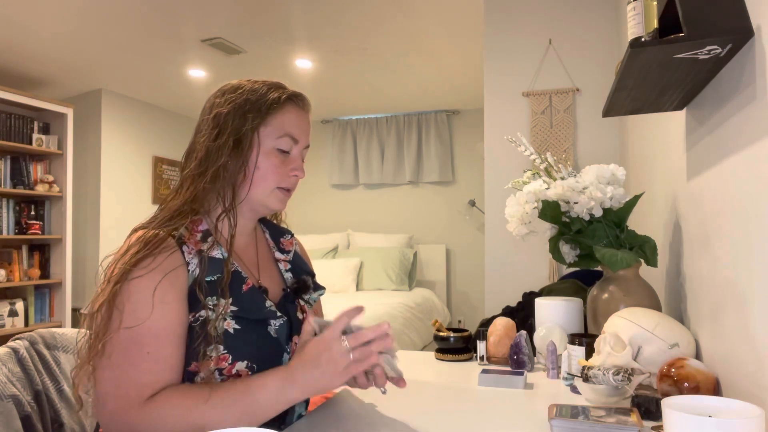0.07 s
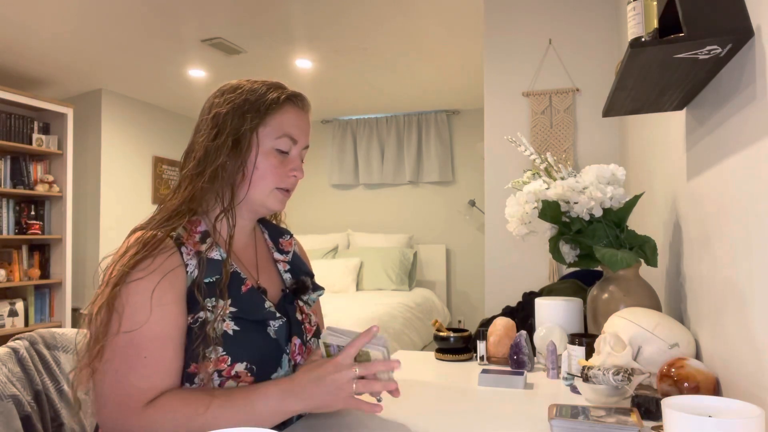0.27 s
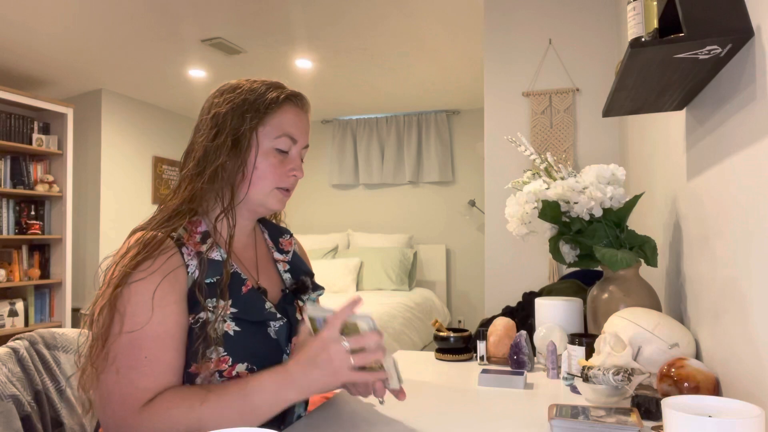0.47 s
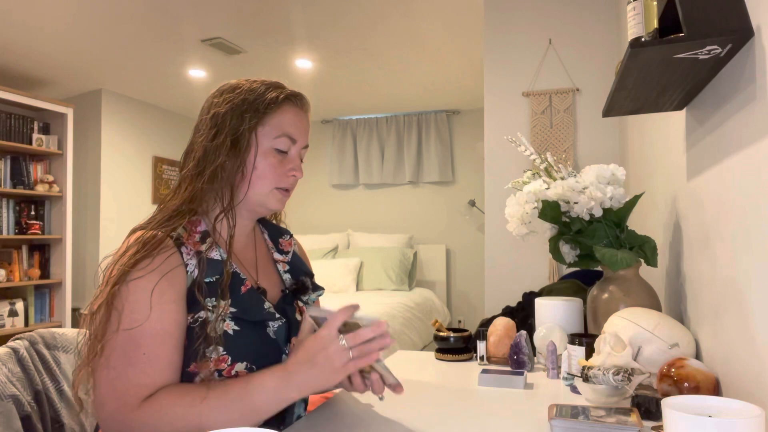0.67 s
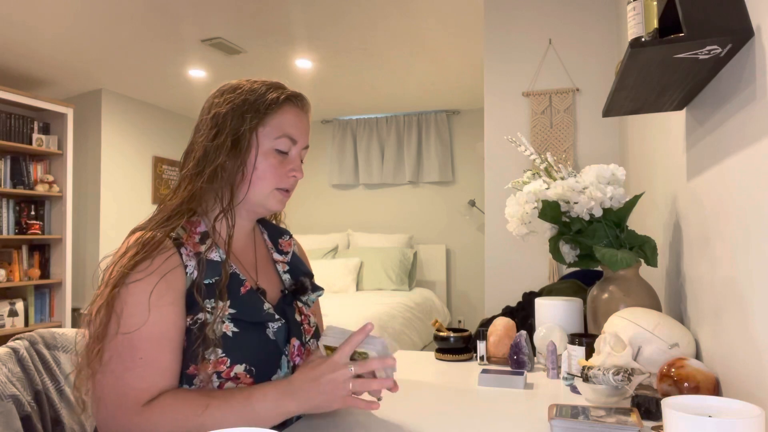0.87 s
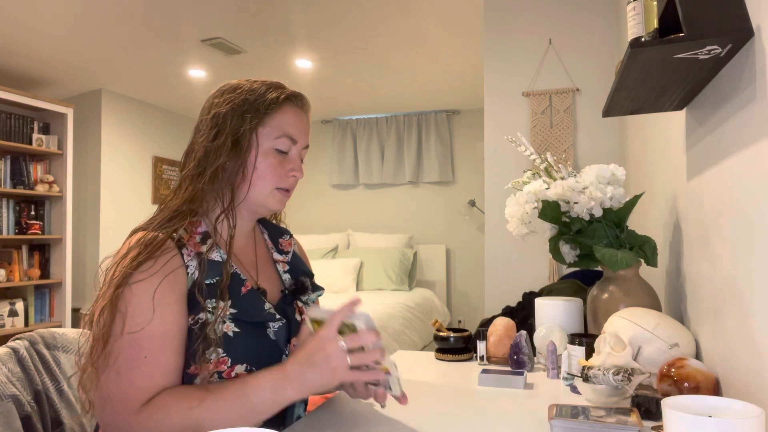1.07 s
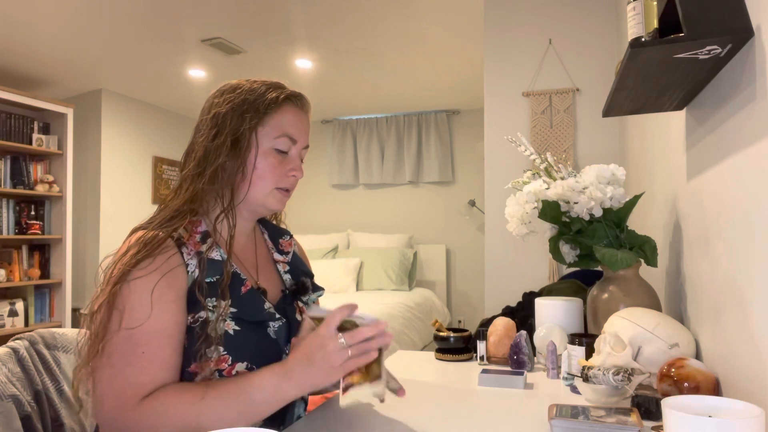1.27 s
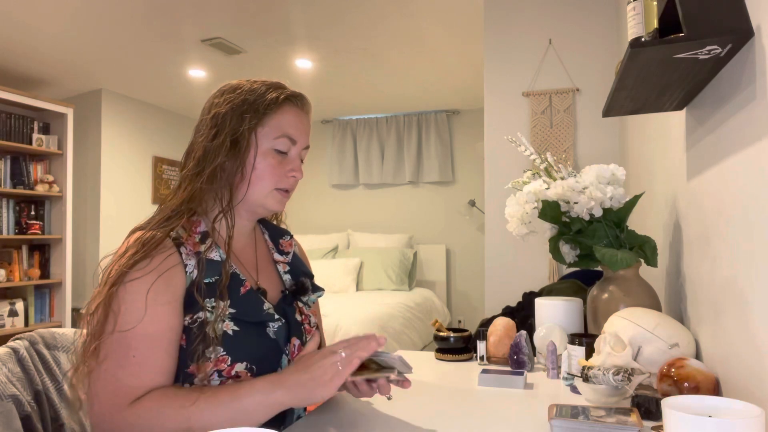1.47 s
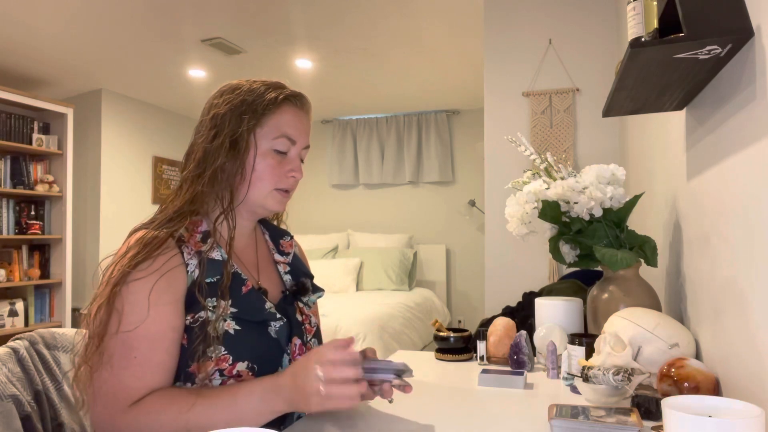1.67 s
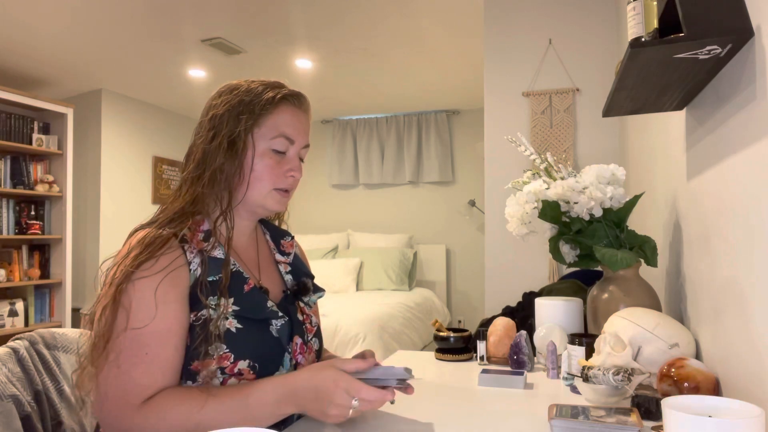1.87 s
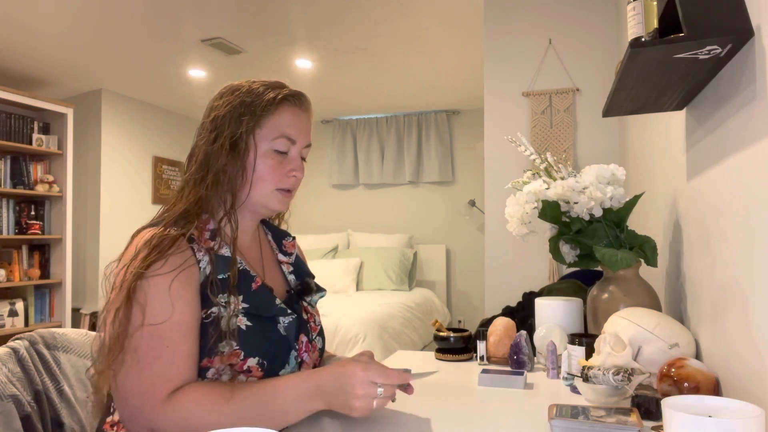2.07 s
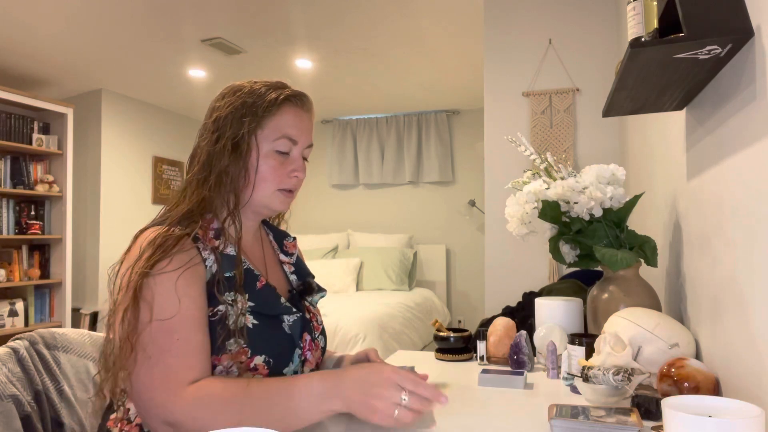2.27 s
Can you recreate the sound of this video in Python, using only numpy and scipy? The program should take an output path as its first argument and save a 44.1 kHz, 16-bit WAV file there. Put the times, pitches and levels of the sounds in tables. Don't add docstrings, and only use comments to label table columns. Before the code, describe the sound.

A deck of large cards is shuffled by hand. Papery flicks at the start, a light snap near 0.44 s, a sharp bright clack at 0.64 s, then faint sliding. From 1.15 to 1.3 s a dense burst of snaps and knocks, loudest at 1.2 s. Afterwards quiet rubs, ticks near 1.65, 1.72 and 1.86 s, soft woody taps at 2.08 and 2.3 s. Soft room, low hum, phone microphone.

```python
import sys
import numpy as np
from scipy import signal
from scipy.fft import rfft, irfft
from scipy.io import wavfile
from scipy.ndimage import uniform_filter1d

SR = 44100
rng = np.random.default_rng(int(sys.argv[2]) if len(sys.argv) > 2 else 0)


def invert_db(x):
    u = np.asarray(x, float) / 20
    return 10 ** u


def materialize(psi):
    bounded = np.clip(np.atleast_2d(psi).T, -1, 1)
    quanta = np.round(bounded * 32767).astype(np.int16)
    wavfile.write(sys.argv[1], SR, quanta)


N = 102267


def level(x, db):
    return x * invert_db(db) / np.sqrt(np.mean(x ** 2))


def band(x, hz, q):
    q = max(q, hz / 15000)
    return signal.lfilter(*signal.iirpeak(hz, q, fs=SR), x)


def walk(rate_hz, size=N):
    hold = int(SR / rate_hz)
    steps = np.repeat(rng.standard_normal(size // hold + 1), hold)
    return 1.3 * uniform_filter1d(uniform_filter1d(steps, hold), hold)[:size]


def add(out, t, x):
    i = max(int(t * SR), 0)
    out[i:i + len(x)] += x[:max(len(out) - i, 0)]


def coloured_noise(gain):
    hz = np.arange(N // 2 + 1) * SR / N + 0.12
    return irfft(rfft(rng.standard_normal(N)) * gain(hz), N)


# [f/Hz, level/dB per Hz]
TONE_SPECTRUM = [(18, -4.5), (30, -15.5), (60, -21), (280, -35.5), (900, -43), (1800, -47.5), (4000, -64),
                 (15000, -77)]


def room_tone():
    tone_db, flicker_db = -35.5, 1.2
    f, db = np.array(TONE_SPECTRUM).T
    hum = coloured_noise(lambda hz: invert_db(np.interp(np.log(hz), np.log(f), db)) * (hz > 14))
    return level(hum * invert_db(flicker_db * walk(5)), tone_db)


def air_sway():
    sway_hz, width_hz, sway_db = 3.88, 3.63, -16.5
    sway = level(coloured_noise(lambda hz: 1 / (1 + ((hz - sway_hz) / width_hz) ** 4)), sway_db)
    t, rest_s = np.arange(N) / SR, 0.06
    return sway * np.tanh(t / rest_s) * np.tanh(t[::-1] / rest_s + .3)


# [f/Hz, T60/s, level/dB]
ROOM_DECAY = [(298.4, 0.3, 6.5), (1200, .22, 7.5), (4000, 0.067, -6), (11000, .18, -4.5)]


def room(x):
    room_db, gap_s = -10.5, 0.0031
    t = np.arange(SR // 2) / SR
    tail = np.zeros(len(t))
    for hz, t60, db in ROOM_DECAY:
        tail += invert_db(db) * band(rng.standard_normal(len(t)), hz, 0.75) * invert_db(-60 * t / t60)
    tail *= np.clip(t / gap_s, 0, 1) ** 2
    tail *= invert_db(room_db) / np.sqrt(np.sum(tail ** 2))
    return signal.fftconvolve(x, tail)[:N]


# [t/s, level/dB, f/Hz, sharpness of
KNOCKS_AND_RINGS = [(.02, -31, 213, 1.3), (.45, -42, 340, 1.6), (0.637, -24, 403, 1.6), (.6375, -23, 884, 3.1),
                    (0.649, -29.5, 263, 1), (.6351, -9.5, 2450, 4.5), (.636, -22, 1500, 3), (.651, -29, 750, 3),
                    (.624, -38, 350, 2), (0.764, -43.5, 223, 1.7), (1.045, -35, 188, 3.6), (1.044, -28, 780, 4.5),
                    (1.147, -26, 330, 1.4), (1.149, -23, 800, 3.4), (1.148, -19, 1900, 2.2), (1.148, -24, 5200, 5),
                    (1.199, -14, 620, 4), (1.192, -21, 560, 3), (1.191, -27, 340, 2.5), (1.172, -22, 600, 3),
                    (1.182, -25, 700, 4), (1.233, -29, 620, 5), (1.206, -24, 370, 4), (1.219, -25, 170, 2.5),
                    (1.229, -24, 330, 5), (1.22, -27, 560, 5), (1.258, -31, 520, 14), (1.305, -34, 520, 9),
                    (1.2, -8.5, 1040, 6), (1.2, -27.5, 148, 2.7), (1.2005, -12, 1570, 9), (1.201, -23.5, 753, 7.4),
                    (1.637, -29.5, 178, 2.7), (1.652, -37, 338, 2.2), (1.72, -37.5, 326, 2.7),
                    (1.7205, -38, 2620, 45), (1.72, -34, 1480, 9), (1.863, -35.5, 1200, 6.1),
                    (1.971, -32.5, 101, 1.9), (2.077, -29.5, 480, 22), (2.076, -33, 660, 12),
                    (2.0756, -21.5, 1354, 13), (2.085, -31, 1380, 8), (2.305, -38, 600, 2), (0.769, -40, 320, 3),
                    (2.078, -33, 330, 5.4), (2.166, -30.5, 190, 2.5), (2.214, -32, 120.7, 1.3), (2.31, -35, 151, 2),
                    (.4392, -31, 1150, 4), (.4393, -30, 5600, 4), (.4395, -36, 2400, 3), (.6352, -19, 3700, 3),
              (1.7205, -45, 5400, 40), (1.721, -46, 8300, 25), (1.858, -41, 9400, 18),
              (2.077, -36, 2150, 8), (2.305, -41, 4200, 5), (1.222, -23, 4900, 4), (1.209, -24, 5000, 4),
              (.002, -32, 600, 3)]


def thuds():
    push_cycles = 0.13
    out, t = np.zeros(N), np.arange(6000) / SR
    for start, db, hz, q in KNOCKS_AND_RINGS:
        push = np.exp(-t * hz / push_cycles)
        knock = band(band(push, hz, q), hz, .7)
        add(out, start, knock * invert_db(db) / np.abs(knock).max())
    return out


# [start t/s, fullest t/s, end t/s, level/dB, grain centre f/Hz]
CARD_SLIDES = [(.012, 0.03, 0.065, -43.5, 2800), (0.003, 0.09, 0.148, -49, 6960),
               (0.188, 0.321, 0.41, -55, 6000), (0.348, 0.435, 0.46, -48, 12500),
               (0.57, 0.625, 0.66, -58, 11500), (0.5, 0.55, .62, -60, 12500),
               (0.628, 0.653, 0.62, -42, 2570), (0.645, 0.7, 0.785, -51, 6940),
               (0.83, 0.953, 1.15, -56.5, 7040), (1.003, 1.04, 1.07, -48, 11500),
               (1.168, 1.177, 1.22, -38, 3020), (1.2, 1.214, 1.33, -36, 3300),
               (1.26, 1.33, 1.44, -55.5, 4000), (1.415, 1.471, 1.515, -49, 2200),
               (1.624, 1.642, 1.76, -50, 3600), (1.716, 1.724, 1.795, -57, 4500),
               (1.9, 1.98, 2.25, -58, 2600), (1.914, 2.049, 2.12, -54, 11000),
               (2.302, 2.305, 2.33, -49, 5000), (2.025, 2.198, 2.356, -53.5, 207),
               (0.216, 0.254, 0.34, -57, 5400), (1.22, 1.262, 1.36, -42, 1700),
               (1.19, 1.215, 1.39, -45.5, 12000), (0.636, 0.652, 0.69, -46, 11500),
               (-.02, 0.001, 0.03, -46, 7000), (2.128, 2.138, 2.155, -60, 2500),
               (0.3, 0.35, 0.39, -56, 2300)]


def slides():
    edge_db, roundness = -25, 2.2
    slide_q, air_db = 0.48, -4.5
    grain_db, flicker_db = 2.2, 1.3
    out, size = np.zeros(N), SR // 2
    for start, full, end, db, hz in CARD_SLIDES:
        t = max(full - .25, 0) + np.arange(size) / SR
        unevenness_db = grain_db * rng.exponential(size=size) + flicker_db * walk(90, size=size)
        grains = rng.standard_normal(size) * invert_db(unevenness_db)
        rub = band(grains, hz, slide_q)
        hiss = level(band(rub, hz, slide_q) + invert_db(air_db) * rub, db)
        before = (full - t) / max(full - start, .002)
        after = (t - full) / max(end - full, .002)
        away = np.maximum(before, after)
        add(out, t[0], hiss * invert_db(edge_db * away ** roundness))
    return out


# [t/s, onset level/dB, ring f/Hz, crackle
# length/ms, treble level/dB]
SNAPS_AND_TICKS = [(.001, -27, 1900, 3.9, 4), (0.0241, -27, 1500, 5.1, 9), (.439, -30, 1150, 1.5, 12),
                   (.6351, -19, 6120, .8, 11.5), (.651, -26.5, 1520, 3.5, 8), (1.0445, -34, 1430, 2.9, -17),
                   (1.148, -25, 2240, 1.3, 5), (1.1718, -11, 1200, 3.2, -7), (1.1945, -27, 2380, 2.5, 5),
                   (1.2005, -9, 1570, 3.2, -23), (1.2075, -16.5, 2227, 5.6, -10.5),
                   (1.2215, -14.5, 2330, 4.4, -14), (1.235, -30, 1940, 3.0, -6), (2.0755, -35, 2300, 2, 0),
                   (2.085, -41, 2500, 1.4, -4), (2.3043, -35, 9500, 2, 5), (1.2003, -6.5, 4700, 1.24, 3),
                   (.655, -28.5, 2230, 2.6, 12),
                   (0.031, -36, 2600, 3.5, 6), (.35, -42.5, 2570, 14, -21), (0.457, -40, 3380, 1.6, 0),
              (0.626, -38, 620, 2.1, -8), (0.683, -47, 2500, 3.0, -3), (0.921, -48, 2800, 7.8, -8),
              (1.055, -60, 1200, 1.3, -9), (1.356, -40, 4500, 5, 5), (1.6306, -41, 2200, 3, 5),
              (1.7204, -33, 1500, 2.8, -3), (1.8581, -46, 9300, 2.2, -12), (1.8634, -43.5, 1220, 2.3, -4),
              (2.134, -47, 1520, 2.5, 10), (1.156, -46, 10500, 2.3, -6), (1.175, -22.5, 9500, 2.3, 6),
              (1.185, -25, 3000, 2.4, -5), (1.2025, -9, 1900, 0.83, 0), (1.212, -21.5, 2700, 2, -4),
              (1.224, -22.5, 2200, 2.5, 1), (1.259, -37, 4460, 1.4, -5), (1.266, -33, 1800, 2.5, 4),
              (1.303, -31, 2200, 3.6, -6), (.664, -39, 1520, 3.4, 0), (1.858, -49, 13400, 1.5, -25),
              (1.864, -46, 5000, 2, -10), (1.882, -54, 3500, 1, 0), (2.077, -44, 8500, 2, -8),
              (.4392, -29, 11500, 1.5, 0), (1.721, -41, 5800, 5, -10), (1.253, -33, 5000, 2, 0),
              (1.311, -34, 3000, 2, 0), (1.231, -26, 2800, 2, 0)]


def snaps():
    snap_db, scatter_db, first_click_db = -5.5, 6, 5
    ring_q, ring_db = 3.2, 10
    second_ratio, second_db, highest_hz = 1.9, -24, 15730
    crack_band = signal.butter(2, [500, 6000], "band", fs=SR)
    out, t = np.zeros(N), np.arange(2048) / SR
    for start, db, hz, ms, treble_db in SNAPS_AND_TICKS:
        signs, scatter = rng.standard_normal((2, len(t)))
        clicks = np.sign(signs) * invert_db(scatter_db * scatter) * np.exp(-t * 1000 / ms)
        clicks[0] = invert_db(first_click_db)
        second_hz = min(hz * second_ratio, highest_hz)
        ring = band(clicks, hz, ring_q) + invert_db(second_db) * band(clicks, second_hz, ring_q)
        crack = invert_db(treble_db) * signal.lfilter(*crack_band, clicks)
        snap = crack + invert_db(ring_db) * np.sqrt(ring_q) * ring
        onset_rms = np.sqrt(np.mean(snap[:128] ** 2))
        add(out, start, snap * invert_db(db + snap_db) / onset_rms)
    return out


def scene():
    knock_room_db = -7
    air = air_sway() + room_tone()
    knocks = thuds()
    cards = slides() + snaps()
    mix = cards + knocks + room(cards + invert_db(knock_room_db) * knocks) + air
    return mix[None]


def band_limit(x):
    return signal.sosfilt(signal.butter(12, 16490, fs=SR, output="sos"), x)


def record(dry):
    knee, headroom = .6, .3
    size = np.abs(dry)
    rounded = np.sign(dry) * (knee + headroom * np.tanh((size - knee) / headroom))
    x = np.where(size < knee, dry, rounded)
    x = signal.lfilter(*signal.butter(1, 12700, fs=SR), x)
    x = signal.sosfilt(signal.ellip(8, .2, 24, 15730, fs=SR, output="sos"), x)
    x = signal.sosfilt(signal.ellip(10, .2, 50, 16450, fs=SR, output="sos"), x)
    return band_limit(np.clip(x, -1, 1))


dry = scene()
out = record(dry)
materialize(out)
```